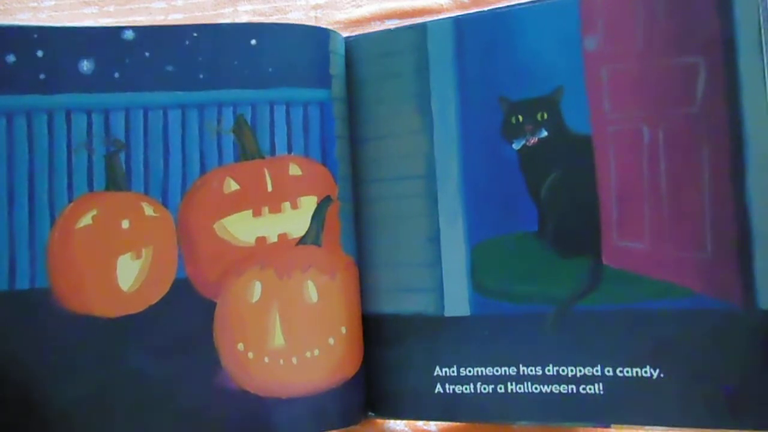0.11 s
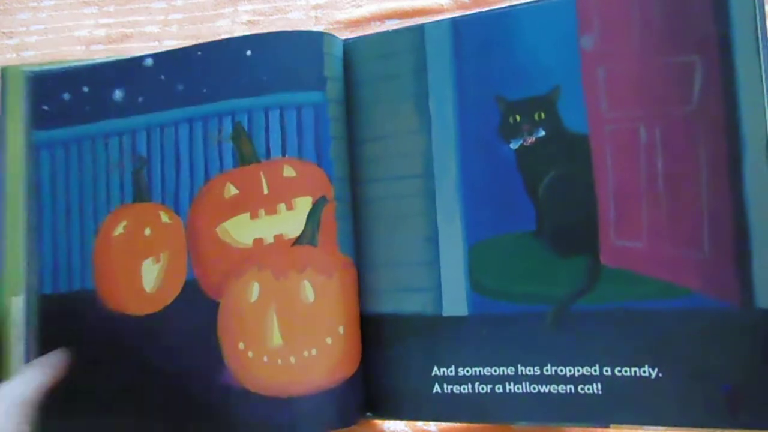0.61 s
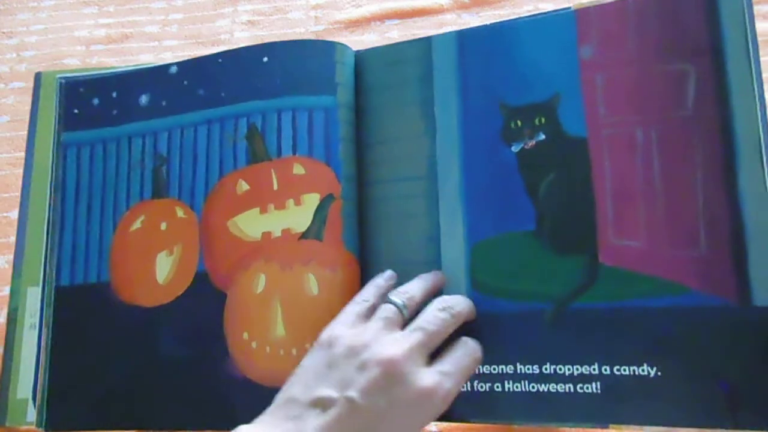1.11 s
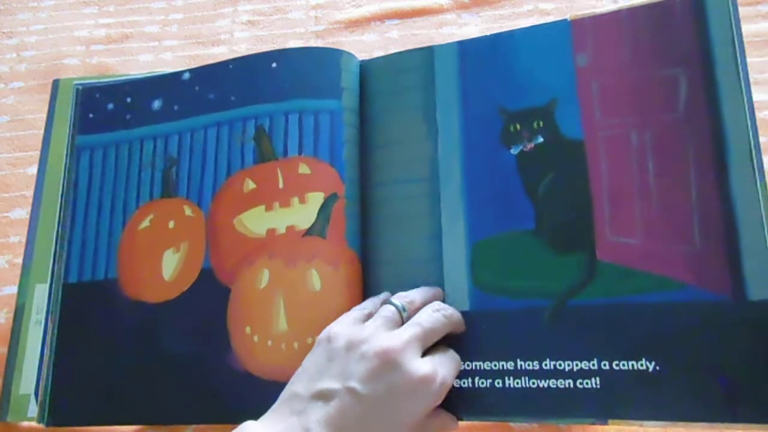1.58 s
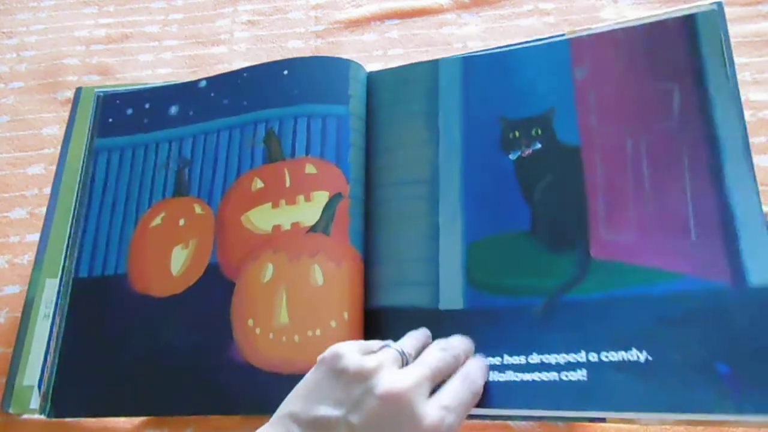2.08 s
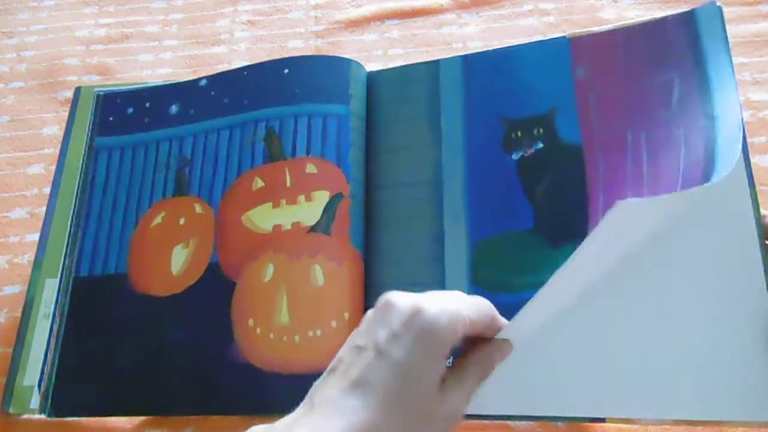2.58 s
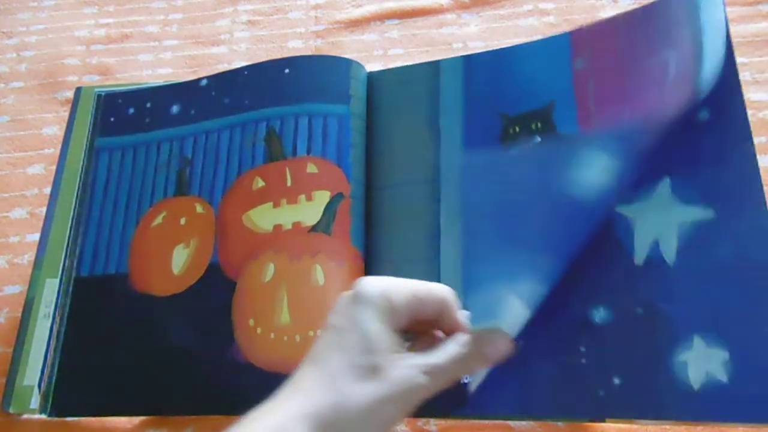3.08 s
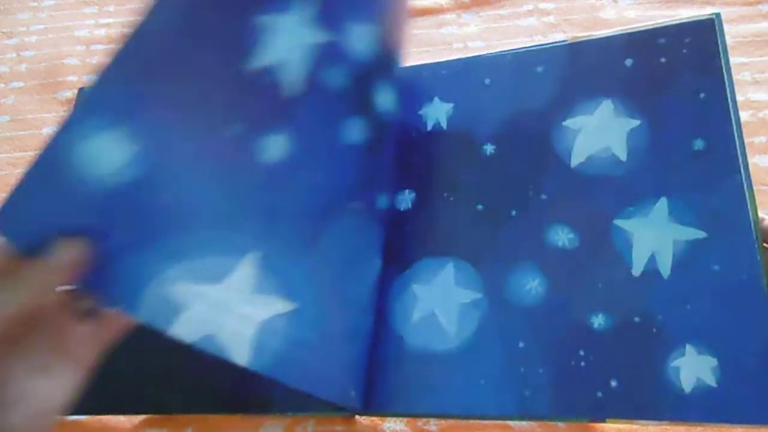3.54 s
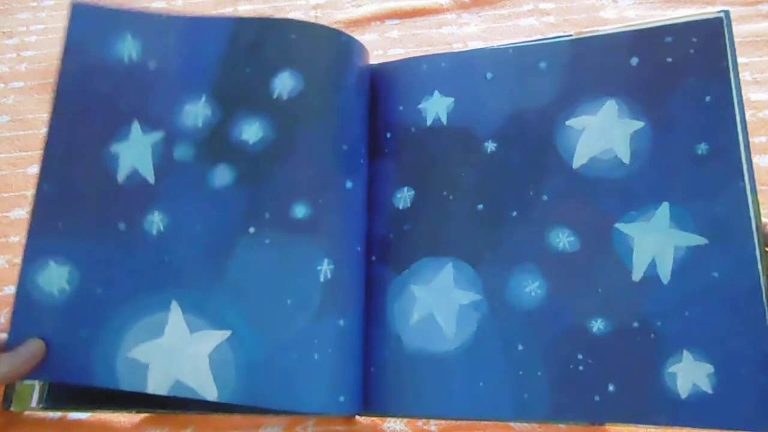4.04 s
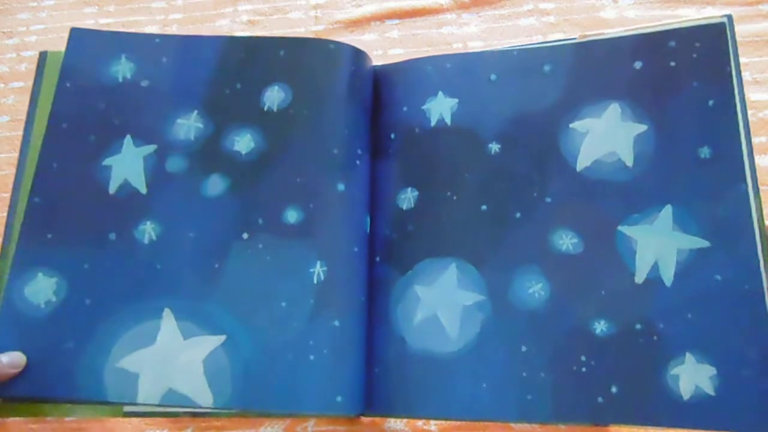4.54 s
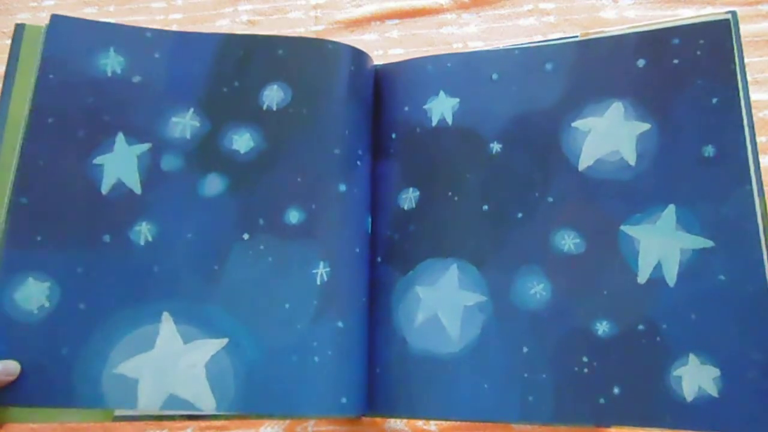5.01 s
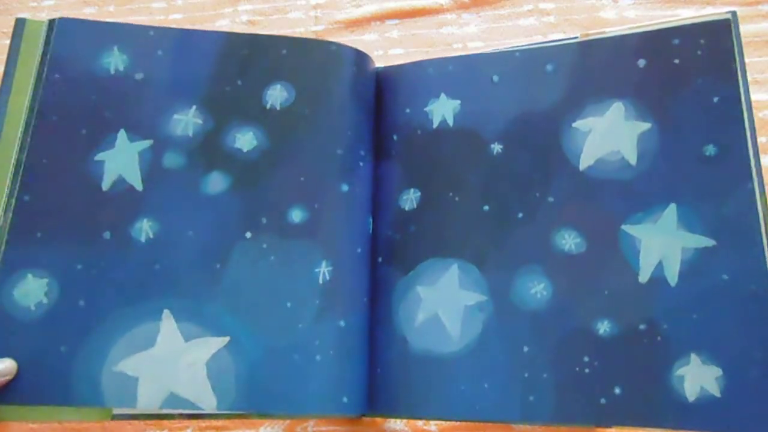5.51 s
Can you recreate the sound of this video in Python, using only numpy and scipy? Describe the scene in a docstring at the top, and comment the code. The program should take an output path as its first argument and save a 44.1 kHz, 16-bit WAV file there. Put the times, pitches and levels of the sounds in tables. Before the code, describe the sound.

Light taps and crackles, then a crisp page turn with rustling and snapping, small settling clicks, and a quick steady ticking in a quiet room.

```python
"""Turning a stiff page

A hand turns one stiff glossy page of a hardcover book close to a microphone in a quiet room.
Steady coloured noise is the hiss under all; friction of fingers and page is noise in uneven grains.
Buckles, taps and binding cracks excite decaying modes of the book; soft bumps excite its lowest modes.
Air pockets lift gliding bands of the rub; near the end a small part ticks fifteen times a second.
"""
import sys
import numpy as np
from scipy import signal
from scipy.fft import rfft, irfft
from scipy.io import wavfile
from scipy.ndimage import uniform_filter1d

SR = 44100
rng = np.random.default_rng(int(sys.argv[2]) if len(sys.argv) > 2 else 0)


def dump_mix(stems):
    """Bounce the given channels to the path in sys.argv[1] as a 16-bit WAV at rate SR."""
    frames = np.atleast_2d(stems).T  # one column per channel
    limited = np.clip(frames, -1, 1)  # hard clip at full scale
    pcm = np.round(limited * 32767).astype(np.int16)
    wavfile.write(sys.argv[1], SR, pcm)


def magnitude_from_level(level_db):
    """Linear magnitude for a level in decibels (20 dB per decade)."""
    exponent = np.asarray(level_db, float) / 20
    return 10 ** exponent


N = 248371  # length in samples


def evened(x):
    """Power normalisation: scales to rms 1."""
    return x / np.sqrt(np.mean(x ** 2) + 1e-20)


def coloured(x, points):
    """Linear filtering: weights the spectrum by a curve drawn over log frequency."""
    f, db = np.transpose(points)
    hz = np.fft.rfftfreq(len(x), 1 / SR)
    gain = magnitude_from_level(np.interp(np.log(hz + 1), np.log(f + 1), db))
    return irfft(rfft(x) * gain, len(x))


def add(mix, s, sound):
    """Superposition: adds a sound into the mix from s seconds on."""
    part = mix[round(s * SR):][:len(sound)]
    part += sound[:len(part)]


def resonate(x, hz, width_hz):
    """Heterodyne resonator: shifts the curve hz down to zero, smooths, and shifts back."""
    turn = np.exp(2j * np.pi * np.cumsum(hz) / SR)
    r = np.exp(-np.pi * width_hz / SR)
    smooth = signal.lfilter([1 - r], [1, -r], x / turn)
    return 2 * (turn * smooth).real


def ring(modes, t):
    """Modal decay: one exponentially damped sine a mode, as rows."""
    hz, db, t60 = np.transpose(modes)[:, :, None]
    return magnitude_from_level(db - 60 * t / t60) * np.sin(2 * np.pi * hz * t)


# Spectrum of microphone and room hiss, relative: f/Hz, density level/dB per Hz
HISS_SPECTRUM = [(20, 0.5), (100, -4.5), (150, -3), (200, -5), (450, -5.5), (1300, -7.5), (1700, -7.5),
                 (3250, -9), (7500, -11.5)]
HISS_DB = -56  # rms level
HUM_HZ, HUM_DB = 155, -86.5  # rms level


def hiss():
    """Stationary noise: Gaussian noise of a fixed spectrum with a faint low hum."""
    hum = magnitude_from_level(HUM_DB) * np.sqrt(2) * np.sin(2 * np.pi * HUM_HZ * np.arange(N) / SR)
    return hum + magnitude_from_level(HISS_DB) * evened(coloured(rng.standard_normal(N), HISS_SPECTRUM))


# Strokes of finger and paper sliding:
# start t/s, rise t/s, fall t/s, reference peak level/dB, brightness level/dB
STROKES = [(0.28, 0.041, .3, -60, -2), (0.44, 0.014, 0.074, -52.5, -2), (0.52, 0.019, 0.088, -48.5, 0.5),
           (0.58, 0.018, .12, -46, -2), (1.52, .09, 0.15, -63.5, 9), (1.69, 0.15, 0.38, -56.5, 4),
           (1.95, 0.035, 0.034, -49.5, 6.5), (2.02, 0.036, 0.21, -58.5, -5), (2.11, .11, 0.33, -46, -1),
           (2.28, 0.088, .04, -50, 6.5), (2.376, .015, 0.32, -47, -2), (2.58, 0.031, 0.16, -49, -1.5),
           (2.712, 0.028, 0.079, -39, 2.5), (2.761, 0.035, 0.19, -34, -.5),
           (2.955, 0.052, 0.055, -37.5, -1), (3.035, 0.026, 0.28, -45.5, 0), (3.152, 0.03, .13, -41.5, 1),
           (3.22, 0.069, 0.11, -48.5, -2), (3.305, 0.047, 0.098, -42, 0), (3.385, 0.013, 0.35, -40.5, 3),
           (3.53, 0.054, 0.094, -37.5, 3.5), (3.6, 0.035, 0.071, -40.5, 0.5), (3.71, .05, 0.22, -57, -2.5),
           (4.035, .01, 0.1, -63, -9), (4.14, 0.063, 0.036, -59.5, -5), (4.215, .03, .04, -59, 0),
           (4.277, 0.013, 0.045, -57, -7), (4.326, 0.017, 0.083, -50.5, 1),
           (4.416, 0.0066, 0.15, -47.5, -2), (4.548, .005, .05, -58, 8), (4.59, 0.021, 0.68, -54.5, -2),
           (4.77, .022, 0.064, -52.5, 4), (4.89, 0.037, 0.026, -56.5, 12)]
# Low, middle and high band of the sheet: relative share level/dB, gain in dB per dB of brightness
BAND_SHARES = [(-11, -2.4), (-7.5, -0.22), (-5.5, 1.16)]
FADE_DB, FADE_BEND, RISE_BEND = -20.5, 1.7, 0.9  # level at the end of the fall; curve exponents
BROAD_LOSS = 0.84  # dB of broad rustle lost per dB of brightness away from zero


def pressure():
    """Incoherent power summation of strokes: a gain for the broad rustle and one for each sheet band."""
    power = np.zeros((1 + len(BAND_SHARES), N))
    share_db, lean = np.transpose(BAND_SHARES)
    for start, rise, fall, peak_db, bright_db in STROKES:
        swell = np.linspace(0, 1, max(round(rise * SR), 2)) ** RISE_BEND
        falls = np.arange(0, 1.6, 1 / (max(fall, .01) * SR))  # time in units of the fall
        fade = magnitude_from_level(FADE_DB * falls ** FADE_BEND)  # lingers, then drops
        shape = magnitude_from_level(peak_db) * np.r_[swell, fade]
        broad_db = -6 - BROAD_LOSS * abs(bright_db)
        bands_db = -4.5 + share_db + lean * bright_db
        for row, db in zip(power, np.r_[broad_db, bands_db]):
            add(row, start, (magnitude_from_level(db) * shape) ** 2)
    return np.sqrt(power)


# Spectrum of the broad part of the rub, relative: f/Hz, density level/dB per Hz
RUSTLE_SPECTRUM = [(200, -37.5), (450, -21.5), (750, -10.5), (1600, -4.5), (2800, -3), (4000, -1.5),
                   (5100, -3), (7400, -3)]
# Broad bands of the bent sheet: centre f/Hz, width f/Hz of each of two resonators in series
SHEET_BANDS = [(1550, 2040), (2870, 3740), (5290, 4640)]


def rub():
    """Stick-slip friction: fibres catch and slip in clumps, and the bent sheet tilts the noise."""
    clumps_db = 1.2 * evened(uniform_filter1d(rng.standard_normal(N), 300))
    grain_db = 2.0 * np.minimum(rng.exponential(1, N), 6)
    slips = evened(magnitude_from_level(clumps_db + grain_db) * rng.standard_normal(N))
    broad = evened(coloured(slips, RUSTLE_SPECTRUM))
    parts = [broad]
    for centre_hz, width_hz in SHEET_BANDS:
        hz = np.full(N, centre_hz)
        parts.append(evened(resonate(resonate(broad, hz, width_hz), hz, width_hz)))
    return (pressure() * parts).sum(0)


# What page and cover ring with: nominal f/Hz, relative level/dB, 60 dB decay time t/s
BOOK_MODES = [(290, -7, 0.014), (460, -3.5, 0.015), (734, 0.5, 0.013), (1043, 9, 0.021), (1337, 5.5, 0.016),
              (1600, 0.5, 0.016), (2013, 6, 0.01), (2110, 8.5, 0.0079), (3020, 10, 0.0048),
              (3440, 4.5, 0.017), (4110, 16.5, 0.0037), (5060, 14, 0.014), (5500, 21, 0.0031),
              (6600, 13, 0.0015), (6510, 13, 0.0095), (8510, 12.5, 0.0094)]
# Limits between cover, page and page treble: f/Hz
MODE_LIMITS = [1400, 3600]
# Corners where a blow's low and high shares take hold: f/Hz
SHARE_CORNERS = [1400, 1450, 2900, 4200]
LEAD = 440  # samples of build-up room before each release
BUILD_MS, BUILD_PER_CRACKLE = .4, .35  # longer crackles also build up longer


def snap(peak_db, low_db, high_db, crackle_ms):
    """Impulsive modal excitation: small slips grow into a sudden release and die away, ringing the book."""
    t = np.arange(3000) / SR
    modes = np.array(BOOK_MODES)
    band = np.searchsorted(MODE_LIMITS, modes[:, 0])
    # page modes shift with the spot that gives, the treble most
    modes[:, 0] *= 1 + 0.024 * band ** 2 * rng.uniform(-1.09, 1, len(modes))
    share_db = np.interp(modes[:, 0], SHARE_CORNERS, [low_db, 0, 0, high_db])
    signs = (-1.) ** np.arange(len(modes))
    rings = (signs * magnitude_from_level(share_db))[:, None] * ring(modes, t)
    cover_filter = signal.butter(2, 200, "high", fs=SR, output="sos")
    page_filter = signal.butter(3, 1200, "high", fs=SR, output="sos")  # a thin sheet moves no bass
    cover = signal.sosfilt(cover_filter, rings[band == 0].sum(0))
    page = signal.sosfilt(page_filter, rings[band > 0].sum(0))

    ms = (t - t[LEAD]) * 1000
    build = ms / max(BUILD_MS + BUILD_PER_CRACKLE * crackle_ms, .1)
    decay = -ms / max(crackle_ms, .3)
    spread = np.exp(np.where(ms < 0, build, decay))
    sparse = rng.random(len(t)) < .25
    slips = 0.13 * spread * rng.standard_normal(len(t)) * sparse
    slips[LEAD] += 1  # the release
    sound = signal.fftconvolve(slips, cover + page)[:len(t)]
    return magnitude_from_level(peak_db) * sound / abs(sound).max()


# Buckles, taps and binding cracks, released 1 ms after t:
# t/s, peak level/dB, low-mode level/dB, high-mode level/dB, crackle time constant t/ms
SNAPS = [(0.325, -45, -20, -10, 3), (0.362, -42, -15, -17, 3), (0.442, -36.5, -16, -8, 3),
         (0.455, -34, -18, -12, 2.9), (0.459, -37, -11, -12, 2.5), (0.528, -34, -11, -15, 3.4),
         (0.538, -25, -11, -6, 2.1), (0.559, -32, -15, -17, 3), (0.586, -32.5, -7, -15, 3.3),
         (0.6, -25, -5.5, -3, 1.8), (0.607, -28.5, -20, 3, 1.5), (0.615, -35, -2, -4, 1.9),
         (0.641, -49, -4, -31, 8.5), (1.501, -31.5, -28, -11, 5.8), (2.379, -22.5, 1, -24, 6.7),
         (2.624, -36.5, -15, -33, 2.9), (2.769, -24, -18, 1, 10), (3.0211, -26, -39, -22, 4),
         (3.0241, -14.5, -38, -24.5, 1.6), (3.105, -31, -31, -16, 7.4), (3.349, -30, -14, -18, .8),
         (3.388, -32, -33, -15, 2.3), (3.813, -44.5, 3, -23.5, 1.4), (3.829, -45, -1, -23.5, 1.4),
         (3.875, -47.5, -10, -20, 2.5), (4.04, -36, 3, -26, 3.6), (4.043, -31.5, -5, -54, 6.1),
         (4.05, -37.5, 5, -33, 22), (4.235, -38.5, -15, -9, 3.3), (4.331, -28.5, -19, -9, 1.7),
         (4.422, -27.5, -12, -6.5, 9.4), (4.47, -29, -7, 1, 2.4), (4.49, -38, -14, -10, 3.6),
         (4.508, -32.5, -28, -12, 2), (4.554, -31, -34.5, -4, 2), (4.593, -35, -9.5, -15.5, 3.1),
         (4.636, -49, -8, -21, 2.1), (4.652, -37, -13.5, -16.5, 6.2), (4.692, -37, -13, -16, 1.4),
         (4.743, -38, -2, -4, 1.5), (4.754, -38.5, -22, -12.5, 2.7), (4.795, -32.5, -14, -6, 1.2),
         (4.995, -42, -25, -8, 2), (5.021, -42.5, -22, -5, 2), (4.985, -43, -22, -7, 3),
         (5.149, -38, -24, 2, 3.2), (5.242, -41, -21, -2, 3), (5.281, -36.5, -30, -1, 1.2),
         (5.289, -34.5, -35, -12, 1.2), (5.486, -30.5, -14.5, -5.5, 2.8), (5.497, -42, -15, -14, 5),
         (5.547, -42.5, -16, -15, 2.7)]
# Spans of faint random cracks while the book shifts: from t/s, to t/s
SETTLING = [(0.29, 0.44), (4.6, 4.78)]
# One faint crack: peak level/dB, low-mode level/dB, high-mode level/dB, crackle t/ms (floored in snap)
FAINT_CRACK = (-42, -12, -16, -1.5)
FAINT_PER_S = 22


def cracks(mix):
    """Superposed transients: adds the listed snaps and faint cracks at uniformly random times."""
    blows = list(SNAPS)
    for start, end in SETTLING:
        count = round(FAINT_PER_S * (end - start))
        blows += [(s, *FAINT_CRACK) for s in rng.uniform(start, end, count)]
    for s, *blow in blows:
        add(mix, s + .001 - LEAD / SR, snap(*blow))


# The soft side of a finger or the page block bumps the cover: onset t/s, peak level/dB
BUMPS = [(0.602, -44.5), (0.639, -47.5), (2.269, -52), (3.346, -45.5), (4.044, -47), (4.057, -41.5),
         (4.605, -43), (5.488, -51)]
PUSH_MS = 4.1  # decay time constant of the push


def bump(peak_db):
    """Soft impact excitation: a padded, uneven push reaches only the lowest modes of the cover."""
    t = np.arange(3000) / SR
    push = np.exp(-t * 1000 / PUSH_MS) * rng.standard_normal(len(t))
    sound = signal.fftconvolve(push, ring(BOOK_MODES[:3], t).sum(0))[:len(t)]
    band = signal.butter(2, [300, 1000], "band", fs=SR, output="sos")
    sound = signal.sosfilt(band, sound)
    return magnitude_from_level(peak_db) * sound / abs(sound).max()


# Air pockets under the curled sheet that whistle faintly in the rub:
# start t/s, length t/s, initial f/Hz, glide f/Hz, lift level/dB over the rub
POCKETS = [(2.14, 0.27, 3070, 80, 6.5), (2.19, .16, 4300, 150, 6.5), (2.136, .2, 1460, -270, 2),
           (2.417, 0.17, 5500, 398, 6), (3.18, 0.094, 6250, -1000, 5.5), (3.655, .14, 3400, -500, 9.5),
           (2.882, 0.1, 1510, 400, 7), (2.152, 0.23, 5260, -340, 9.5), (2.188, 0.18, 6770, 200, 6),
           (2.593, 0.094, 4180, -52, 10.5), (2.737, 0.19, 4530, -8, 8.5), (2.775, 0.14, 1430, 46, 7.5),
           (2.825, 0.06, 2460, -100, 7), (2.873, 0.16, 4070, -60, 7), (3.04, .09, 4000, 500, 5),
           (3.19, 0.13, 2640, -300, 4.5), (3.38, 0.051, 2480, -80, 6.5), (3.394, 0.13, 5300, -13, 6),
           (3.557, 0.13, 4980, -49, 8.5), (3.573, 0.14, 2800, -8, 9.5), (3.547, 0.098, 3480, 48, 7),
           (3.585, 0.13, 1600, -40, 5)]
POCKET_WIDTH_HZ = 660  # of each of two resonators in series


def whistles(sheet):
    """Cavity resonance: each air pocket lifts a narrow, gliding band of the rub."""
    sound = np.zeros(N)
    for start, length, from_hz, glide_hz, db in POCKETS:
        part = sheet[round(start * SR):][:round(length * SR)]
        hz = from_hz + np.linspace(0, glide_hz, len(part))
        lifted = resonate(resonate(part, hz, POCKET_WIDTH_HZ), hz, POCKET_WIDTH_HZ)
        # the rub itself supplies the remaining 1
        add(sound, start, (magnitude_from_level(db) - 1) * lifted * signal.windows.tukey(len(part), .7))
    return sound


# Modes of the small ticking part: f/Hz, relative level/dB, 60 dB decay time t/s
TICK_MODES = [(684, -10, 0.09), (1827, 1.5, 0.035), (2430, -1, 0.019), (2800, 8.5, 0.01), (4540, 5, 0.0088)]


def tick(peak_db):
    """Impulsive modal excitation: a stiff part clicks once, with two short, weaker pulses ahead of the click."""
    t = np.arange(2000) / SR
    pulses = np.zeros(200)
    pulses[[0, 70, 130]] = [.35, -.55, 1] * rng.uniform(0.52, 1.3, 3)  # pulse strengths vary
    sound = np.convolve(pulses, ring(TICK_MODES, t).sum(0))
    return magnitude_from_level(peak_db) * sound / abs(sound).max()


# Ticks, each with its first short pulse 1 ms before t: t/s, peak level/dB
TICKS = [(4.796, -46), (4.8623, -40.5), (4.929, -42), (5.004, -38), (5.07, -39.5), (5.1291, -38),
         (5.1988, -37.5), (5.2638, -37), (5.33, -38.5), (5.3966, -38.5), (5.466, -39), (5.531, -38.5),
         (5.6017, -39.5)]


def scene():
    """Linear superposition of all sources at the single microphone."""
    sheet = rub()
    mix = hiss() + sheet + whistles(sheet)
    cracks(mix)
    for s, db in BUMPS:
        add(mix, s, bump(db))
    for s, db in TICKS:
        add(mix, s - .001, tick(db))
    return mix[None]


def band_limit(x):
    """A steep low-pass at the top of the band."""
    return signal.sosfilt(signal.butter(12, 9040, fs=SR, output="sos"), x)


# Band limit, a weak step near 8 kHz, then a steep cutoff near 9 kHz: f/Hz, level/dB
BAND_LIMIT = [(7600, -0.5), (8000, -19.5), (8400, -13), (8800, -26.5), (9030, -34.5), (9120, -100)]


def record(dry):
    """Band limitation: the treble weakens in a step near 8 kHz and is cut off steeply near 9 kHz."""
    finished = coloured(dry[0], BAND_LIMIT)[None]
    return band_limit(finished)


dry = scene()
out = record(dry)
dump_mix(out)
```